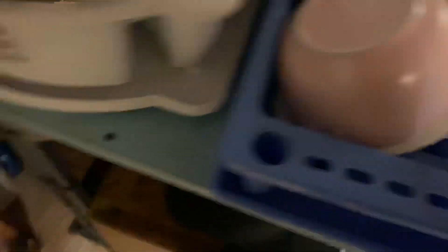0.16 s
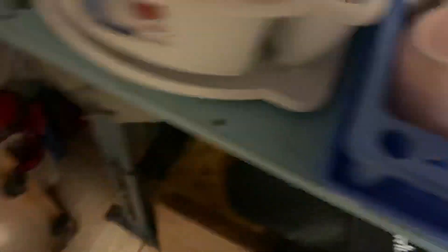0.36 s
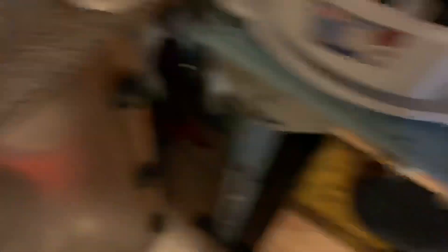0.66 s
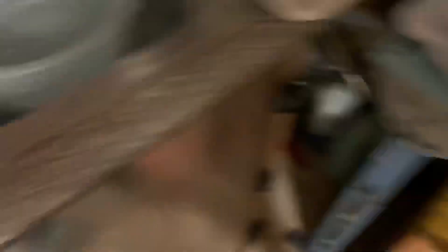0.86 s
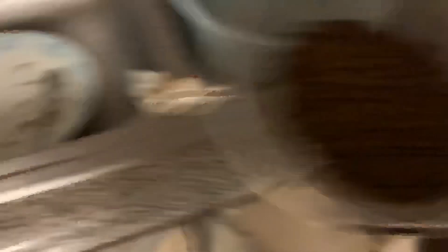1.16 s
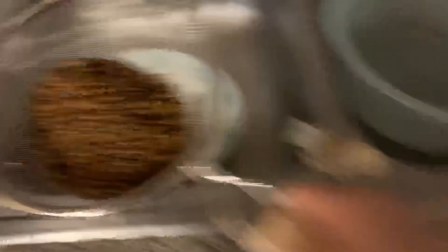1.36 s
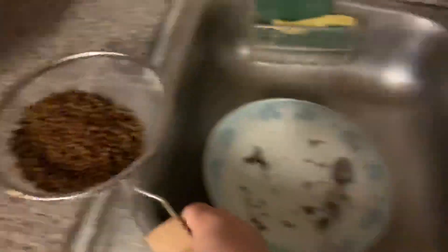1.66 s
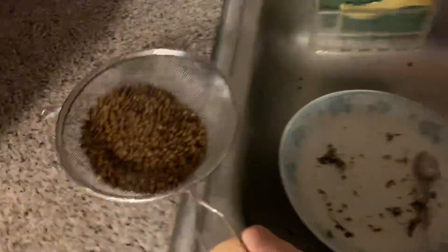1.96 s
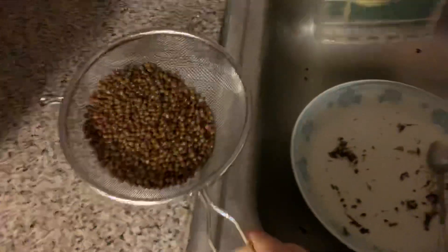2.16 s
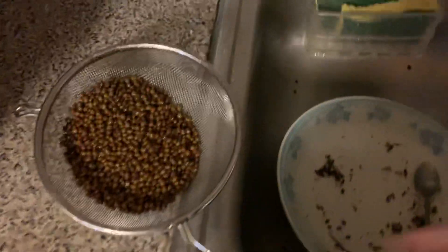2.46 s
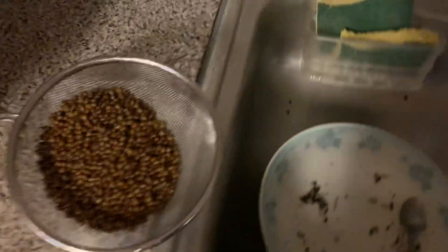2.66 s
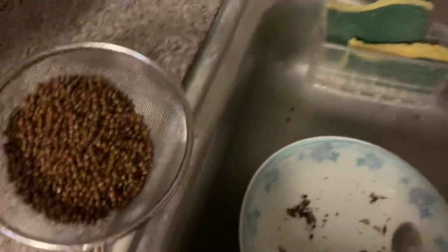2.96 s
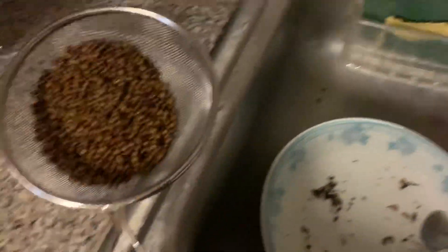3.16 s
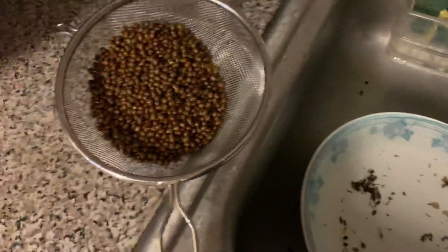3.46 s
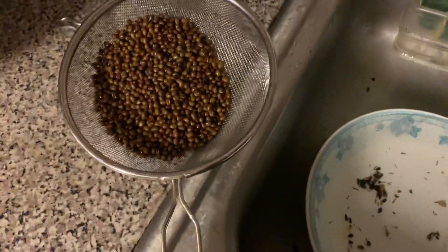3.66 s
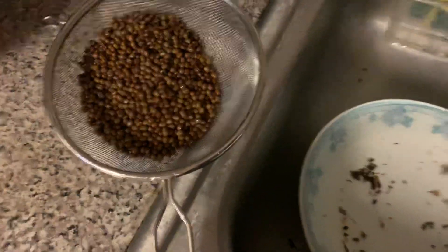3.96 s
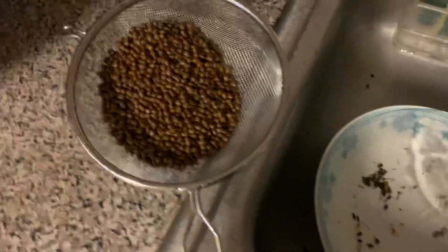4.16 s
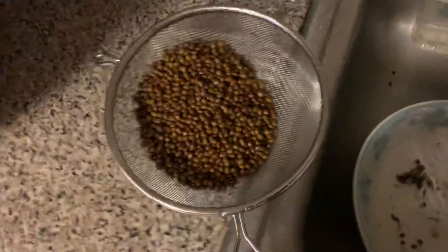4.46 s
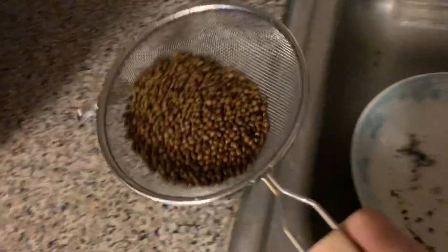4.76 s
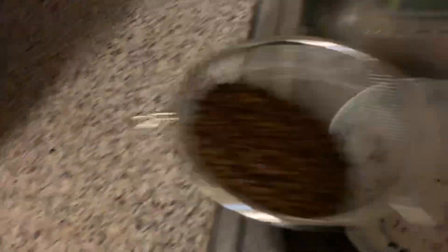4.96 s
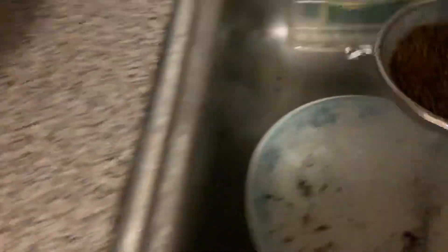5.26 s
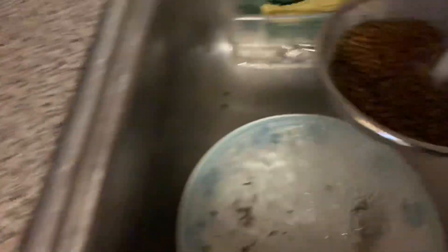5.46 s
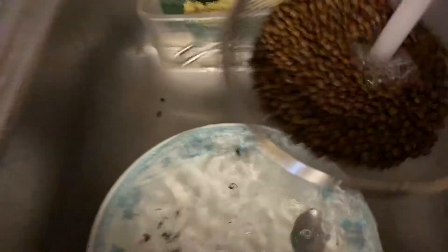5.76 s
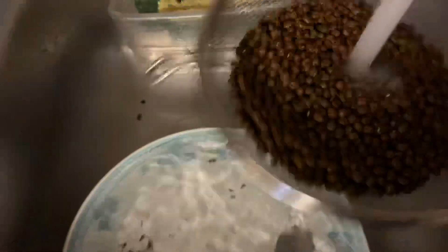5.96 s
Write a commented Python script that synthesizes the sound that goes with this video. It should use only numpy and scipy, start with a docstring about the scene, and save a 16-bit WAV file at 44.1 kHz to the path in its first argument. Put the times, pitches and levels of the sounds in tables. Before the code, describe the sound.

Close kitchen handling: metal clinks, dry beans rustling, hollow sink thuds, then a sudden steady tap stream that turns to bubbly splashing and gurgling.

```python
"""A small kitchen before a close pair of microphones: low rumble and the hum of an appliance throughout.
A wire strainer of beans is picked up straight ahead with a clink of ringing rim modes and carried to the
side; beans slide and tumble in its mesh (dense random grains), it is set down, and blows boom in the steel sink.
The tap spits a burst of grains, then runs: aerated hiss, resonances of the basin and drumming on its floor.
At last the stream splashes over the beans, as drops and ringing bubbles, and gurgles into a bowl below."""
import sys
import numpy as np
from scipy import signal
from scipy.fft import rfft, irfft, next_fast_len
from scipy.io import wavfile

SR = 44100
rng = np.random.default_rng(int(sys.argv[2]) if len(sys.argv) > 2 else 0)


def put_to_file(sound):
    """Save the sound as 16-bit audio at rate SR, in the file named by the first command-line argument."""
    columns = np.atleast_2d(sound).T  # one column per channel
    safe = np.clip(columns, -1, 1)
    whole_steps = np.round(safe * 32767)
    wavfile.write(sys.argv[1], SR, whole_steps.astype(np.int16))


N = 269451
TIME = np.arange(N) / SR

# rumble of the room: (frequency [Hz], level [dB])
RUMBLE_SPECTRUM = [(12, -35.5), (20, -3.5), (32, -3.5), (54, -1.5), (72, -15), (124, -14.5), (155, -25),
                   (256, -25), (357, -23.5), (387, -28), (433, -32), (753, -40.5), (1210, -41), (1930, -53),
                   (15000, -60.5)]
RUMBLE_DB = -50
# appliance hum: (frequency [Hz], level [dB])
HUM_TONES = [(48.4, -52.5), (355.3, -77), (1190, -83), (1308, -93.5), (1427, -85), (3445, -93),
             (3984, -92.5)]

# beans slide in the mesh at each tilt or jolt: (time [s], length [s], level [dB], scrape pitch [Hz])
SLIDES = [(0, 0.24, -64.5, 4740), (0.101, 0.026, -47, 4820), (1.165, 0.32, -71.5, 2630),
          (1.366, 0.039, -47.5, 2900), (1.421, 0.19, -45, 3950), (1.667, 0.031, -51, 3480),
          (1.801, 0.013, -52.5, 3500), (1.944, 0.13, -78, 3470)]
# bean against mesh: (frequency [Hz], level [dB])
BEAN_SPECTRUM = [(400, -8.5), (1000, -14.5), (1500, -3), (2600, -11.5), (3600, 4.5), (5200, 3.5),
                 (7500, 13), (10000, 11), (13000, 11), (15000, 0)]
SLIDE_RISE_S, SLIDE_T60_S, TICK_T60_S = 0.026, 0.22, 0.011
# soft handling noise while things are carried: (time [s], length [s], level [dB])
CARRIES = [(0, 0.033, -49.5), (0.539, 0.27, -63.5), (0.939, 0.021, -50.5), (1.2, 0.848, -57.5),
           (2.22, 0.11, -60.5)]
CARRY_RISE_S, CARRY_T60_S = 0.075, 0.37
# colour of the handling noise: (frequency [Hz], level [dB])
RUSTLE_SPECTRUM = [(60, -3), (130, -11), (300, -6), (700, -15), (1500, -22.5), (4000, -31.5),
                   (15000, -55.5)]
# dull knocks of handle and dishes:
# (time [s], level [dB], pitch [Hz], t60 [s], relative clack level [dB], clack top [Hz])
KNOCKS = [(.071, -55, 1200, .025, 2, 1500), (.116, -28, 600, 0.028, -10, 1500),
          (0.288, -44.5, 260, 0.1, -13, 500), (0.396, -24, 225.7, 0.045, -14, 450),
          (1.161, -32.5, 278, 0.062, -5, 500), (1.467, -37.5, 330, 0.036, 5, 1710),
          (1.689, -23.5, 330, 0.041, -18, 900), (1.732, -27, 302, 0.07, -15.5, 1000),
          (1.808, -31, 290, 0.085, 2, 2900), (1.909, -37, 376, 0.038, -1, 1600),
          (4.044, -27, 560, 0.03, 8, 1500)]
# sharp contacts of the wire rim: (time [s], level [dB], relative ring level [dB])
CLINKS = [(.115, -18.5, -4.5), (0.1194, -41, -7), (0.312, -46.5, -26), (0.325, -50.5, -8),
          (1.284, -38, -28), (1.3275, -35.5, -22), (1.689, -34, -19), (1.812, -28, -19),
          (1.9077, -44.5, -23), (2.042, -47.5, -23.5), (2.212, -33, -25), (2.278, -52, -25),
          (2.3536, -44.5, -27), (3.409, -47, -12)]
# modes of the wire rim: (frequency [Hz], level [dB], t60 [s])
RIM_MODES = [(4650, -14, 0.082), (5144, -2, 0.028), (6140, -9, .04), (6930, -18, 0.038), (7340, -28, .07),
             (7880, -17.5, 0.19), (10250, -10, .04), (12400, -13, 0.11), (12500, -16.5, .11),
             (13290, -13.5, .1), (13800, -20.5, .07), (14060, -26.5, 0.073)]
# the heap of beans breaks loose as the strainer swings over the sink
TUMBLE_S, TUMBLE_HOLD_S, TUMBLE_DB, TUMBLE_RISE_S, TUMBLE_T60_S = 1.381, .016, -46, .008, .11

# blows on the sink: (time [s], level [dB], pitch round which the struck spot responds [Hz])
SINK_BLOWS = [(1.808, -32, 90), (2.217, -36.5, 164), (3.243, -27.5, 171), (3.308, -20.5, 87),
              (3.347, -18, 243), (3.351, -21.5, 83.6), (3.383, -25, 98.7), (3.775, -24.5, 155),
              (3.796, -30, 182), (4.055, -29.5, 130.6)]
# modes of the steel sink: (frequency [Hz], level [dB], t60 [s])
SINK_MODES = [(67.6, -7, 0.81), (90.7, 2.5, 0.11), (119.2, -5, 0.36), (125.5, -12.5, 0.76),
              (177, -12, 0.52), (200, -3, 0.087), (227.4, -20, 0.22), (252.4, -24, 0.2), (296, -17.5, 0.36),
              (375.6, -22, 0.4), (461, -11.5, 0.55), (570, -21, 0.35), (810, -14, 0.3), (978, -5, 0.67)]
# after the heaviest blow the strainer rocks to rest between two spots of the sink
ROCK_S, ROCK_GAP_S, ROCK_DB, ROCK_LOSS_DB = 3.455, 0.034, -25, 2.5
# pitch round which each of the two spots responds: one column [Hz]
ROCK_SPOTS = [81, 158]
# loose things rattling on the shaking steel: (frequency [Hz], level [dB])
RATTLE_SPECTRUM = [(250, 2), (600, -6), (1100, -17), (2200, -33), (3500, -34), (7000, -45), (15000, -44)]
# the strainer clatters on the steel edge:
# (time [s], level [dB], relative clack level [dB], pitch round which the touched spot rings [Hz])
CLATTERS = [(1.81, -40, 5, 1520), (3.304, -44, -19, 743), (3.345, -24.5, 4.5, 974), (3.359, -31.5, -4, 895),
            (3.384, -43.5, -3, 746), (3.409, -43.5, 11, 1400), (3.494, -49.5, 3, 810),
            (4.044, -39, 7, 1500)]
# modes of that contact: (frequency [Hz], level [dB], t60 [s])
EDGE_MODES = [(292, 4.5, 0.3), (440, 2.5, 0.13), (577, -1, 0.12), (650, 0.5, 0.048), (830, -16, 0.097),
              (976, -2, 0.047), (1150, -16, 0.025), (1270, -6.5, 0.059), (1400, -3, 0.044),
              (1870, -5, 0.044), (2050, -2.5, 0.05), (2340, -12, 0.044)]
# dry clack of the strainer on the steel: (frequency [Hz], level [dB])
CLACK_SPECTRUM = [(200, 3), (600, 20), (1300, 14), (2200, 20), (3500, -5), (7000, -32), (15000, -38)]
# each clatter is a light graze, then a quick run of ever softer touches
TOUCH_GAP_S, TOUCH_LOSS_DB, GRAZE_DB = 0.0046, 2.5, -9.5
SPOT_WIDTH_OCT = 0.45
# a dish is nudged: (time [s], level [dB])
NUDGES = [(1.81, -40.5), (2.207, -51), (3.407, -57)]
# modes of the dish: (frequency [Hz], level [dB], t60 [s])
DISH_MODES = [(1200, -15, 0.056), (1300, -1, 0.11), (1383, 1, 0.11), (1644, -5, 0.13), (1940, -13, .08),
              (2360, -10, 0.065)]
# the strainer is set down on the counter: (time [s], level [dB], top of the touch [Hz])
SET_DOWNS = [(2.2063, -40, 2200), (2.2164, -40, 700), (2.327, -51.5, 600)]
# modes of the loaded strainer: (frequency [Hz], level [dB], t60 [s])
STRAINER_MODES = [(313, -11, 0.27), (367, -8, 0.28), (542, -2, 0.073), (593, 3, 0.091), (694, -12, .16),
                  (816, 4.5, 0.063), (1180, 6.5, 0.021), (1400, 1, 0.023), (1740, -8, 0.037)]

# the spout spits once before the water arrives
SPIT_S, SPIT_HOLD_S, SPIT_DB, SPIT_RISE_S, SPIT_T60_S = 3.758, 0.05, -33, 0.003, 0.18
# colour of the spit: (frequency [Hz], level [dB])
SPUTTER_SPECTRUM = [(300, -1.5), (450, -12), (680, 3), (950, -2.5), (1250, -9), (2000, -4), (3000, -3.5),
                    (4500, -18.5), (8000, -19.5), (15000, -22.5)]
# the tap opens with a surge of pressure that settles to a steady flow
OPEN_S, OPEN_RISE_S, SURGE_DB, SETTLE_S = 3.837, 0.0099, 2, 0.32
STREAM_DB = -31
# colour of the aerated jet: (frequency [Hz], level [dB])
HISS_SPECTRUM = [(200, -25), (450, -22), (800, -18), (1200, -11.5), (1600, -9.5), (1950, -7), (2250, -12),
                 (2600, -7.5), (3050, -11.5), (3600, -9.5), (4700, -8.5), (5250, -10), (5700, -8.5),
                 (8500, -0.5), (11500, 3), (15000, 5.5)]
# last pockets of air make the hiss flare: (time [s], level [dB])
SPURTS = [(3.844, 4), (3.929, 3.3)]
SPURT_S = 0.014
# resonances that colour the jet in the basin: (frequency [Hz], width [Hz], level [dB])
BASIN_RESONANCES = [(330.6, 28.6, 17), (471, 14, 14.5), (965, 64, 13), (1553, 33, 16.5), (1780, 35, 16.5),
                    (2005, 66, 17.5), (2597, 51, 15.5), (3690, 140, 10), (4035, 74, 17), (4616, 380, 10),
                    (6150, 150, 13.5), (6540, 190, 12.5)]
# once the beans cover the stream, it sounds the basin far less
COVER_S, COVER_LENGTH_S, COVER_LOSS_DB = 5.29, 0.044, 18
# the stream drumming on the sink floor: (frequency [Hz], level [dB])
DRUM_SPECTRUM = [(60, 8), (95, 0.5), (135, 3.5), (180, -16.5), (250, -12.5), (450, -19.5), (900, -21),
                 (4000, -70)]
# the drumming is harder in the surge and again as the splash grows
DRUM_DB, DRUM_SURGE_DB, DRUM_SPLASH_LIFT_DB = -46, 0.5, 3
# the mesh cuts into the stream and lifts its hiss; the hiss lifts again with the splash
MESH_S, MESH_ENTRY_S, MESH_LIFT_DB, SPLASH_LIFT_DB = 5.11, 0.21, 2.5, 5.5
# the stream sounds hollow, with peaks round the odd multiples of this pitch
HOLLOW_HZ = 501

# how hard the water lands on the beans as the strainer moves under it: (time [s], level [dB])
SPLASH_LEVELS = [(4.3, -65), (5.1, -47), (5.38, -38.5), (5.62, -34), (5.88, -32.5), (5.92, -28),
                 (5.96, -32), (6.02, -28), (6.05, -33.5), (6.11, -27.5)]
# drops on the beans: (frequency [Hz], level [dB])
SPATTER_SPECTRUM = [(200, 1), (350, -23), (550, -6), (800, 4.5), (1300, 10), (1700, 3), (2100, 13),
                    (3800, 15), (6500, 10), (9000, -3), (11000, -23.5), (15000, -35)]
# lumps of water land, first on the steel, then on the beans and in the bowl:
# (time [s], length [s], level [dB], centre [Hz])
SPLATS = [(4.167, 0.0097, -43, 600), (4.326, 0.018, -51, 550), (5.046, .008, -43, 680),
          (5.629, 0.007, -34, 830), (5.811, 0.011, -37, 840), (5.899, 0.018, -28.5, 4070),
          (6.02, 0.0051, -37, 1090)]
# run-off gurgles in the bowl from this time on, at a level relative to the splash
GURGLE_S, GURGLE_DB, GURGLES_PER_S = 5.35, -15.5, 90
# run-off patters into the bowl below, which sings: (frequency [Hz], width [Hz], level [dB])
BOWL_RESONANCES = [(476, 17, 10), (600, 27, -1), (1240, 62, 9), (1400, 41, 13.5), (1995, 190, 13.5)]
# larger bubbles: (time [s], level [dB], starting pitch [Hz], t60 [s])
GLUGS = [(5.358, -48.5, 600, 0.24), (5.392, -46.5, 485, 0.93), (5.512, -38, 589, 0.19),
         (5.635, -37.5, 493, 0.082), (5.762, -44.5, 686, 0.22), (5.812, -41, 1180, 0.064),
         (5.858, -45, 940, 0.1), (5.905, -39.5, 614, 0.091), (5.945, -42, 589, 0.17),
         (6.02, -36, 1240, 0.022)]

KITCHEN_T60_S = 0.22
# stereo width of sounds from the side: (frequency [Hz], side gain [dB])
SIDE_WIDTH = [(15, -12.5), (100, -16), (500, -12), (1500, 0.5), (2300, -0.5), (3000, -4), (7000, 2.5),
              (9000, -16), (12000, -6), (15000, -14)]
# depth of the dips in that width, where both ports hear alike: (frequency [Hz], share [0-1])
PORT_DIPS = [(100, 0.05), (6000, 0.22), (9000, 1), (11000, 1), (15000, 0.94)]
# the left side's extra level: (frequency [Hz], level [dB])
LEFT_BALANCE = [(10, -5), (100, 0.5), (500, -0.5), (1200, 2), (2500, 5), (4500, -0.8), (15000, -0.5)]
# stereo width of sounds straight ahead: (frequency [Hz], side gain [dB])
AHEAD_WIDTH = [(200, -14), (600, -9), (2000, -7), (4000, -5), (7000, 0), (10000, 0.5), (15000, -0.5)]
LEFT_LAG_S = .00022
# the strainer starts straight ahead at the rack and swings to the side from this time on
TURN_S, TURN_LENGTH_S = 0.84, 0.25
CUTOFF_HZ = 15700


def from_db(db):
    """Decibels to gain."""
    return 10 ** (np.asarray(db) / 20)


def rms_one(x):
    """Scale to unit rms."""
    return x / np.sqrt(np.mean(x ** 2) + 1e-20)


def in_time(rows):
    """Each column of a curve at every sample."""
    s, *columns = np.transpose(rows)
    return [np.interp(TIME, s, c) for c in columns]


def colour(x, spectrum):
    """Filter by a (Hz, dB) curve that falls away below its first point."""
    size = next_fast_len(x.shape[-1] + 4096)
    hz = np.maximum(np.fft.rfftfreq(size, 1 / SR), 1)
    points, db = np.transpose(spectrum)
    gain = from_db(np.interp(np.log(hz), np.log(points), db))
    gain = gain * np.minimum(hz / points[0], 1) ** 2
    return irfft(rfft(x, size) * gain, size)[..., :x.shape[-1]]


def low_pass(x, top_hz):
    """Second-order low-pass."""
    return signal.sosfilt(signal.butter(2, top_hz, fs=SR, output="sos"), x)


def drift(rate):
    """Slow chance with rms 1, drawn at every 40th sample; a higher rate wanders faster."""
    r = np.exp(-80 * np.pi * rate / SR)
    slow = signal.lfilter([1], [1, -2 * r, r * r], rng.standard_normal(N // 40 + 2002))[2000:]
    return np.interp(np.arange(N) / 40, np.arange(len(slow)), rms_one(slow))


def ring(clicks, hz, t60):
    """A unit click sets a decaying sine of starting height 1 ringing."""
    r, w = from_db(-60 / (t60 * SR)), 2 * np.pi * hz / SR
    return signal.lfilter([0, np.sin(w)], [1, -2 * r * np.cos(w), r * r], clicks + 1e-18)


def resonate(x, hz, width_hz):
    """A resonance with gain 1 on top."""
    r = np.exp(-np.pi * width_hz / SR)
    feed = np.array([1, 0, -1]) * (1 - r * r) / 2
    return signal.lfilter(feed, [1, -2 * r * np.cos(2 * np.pi * hz / SR), r * r], x)


def fade(t60):
    """Half a second of exponential decay."""
    return from_db(-60 * TIME[:SR // 2] / t60)


def swell(s, hold_s, rise_s, t60):
    """An envelope that rises at time s, holds and dies away."""
    rise = np.clip((TIME - s) / rise_s, 0, 1)
    return rise * from_db(-60 * np.clip((TIME - s - hold_s) / t60, 0, 2))


def add(track, s, sound):
    """Mix a sound into a track at time s."""
    start = int(s * SR)
    track[..., start:start + sound.shape[-1]] += sound[..., :N - start]


def grains(per_s, spread_db):
    """Random stereo clicks of uneven size; a changing rate leaves their mean power even."""
    sizes = from_db(spread_db * np.minimum(rng.exponential(1, N), 4))
    born = rng.random(N) < per_s / SR
    return rms_one(born * sizes * rng.standard_normal((2, N)) / np.sqrt(per_s))


def kitchen(x, wet_db):
    """A close source plus dense reflections from tiles and steel, different on each side."""
    tail = rng.standard_normal((2, SR // 2)) * fade(KITCHEN_T60_S) * (TIME[:SR // 2] > .003)
    tail /= np.sqrt(np.sum(tail ** 2) / 2)
    return x + from_db(wet_db) * signal.fftconvolve(x[None], tail, axes=1)[:, :N]


def basin_walls(x, wet_db=-11, t60=0.053):
    """Quick reflections between the steel walls put a fine ripple on the sound's colour."""
    echoes = rng.standard_normal(SR // 2) * fade(t60) * (TIME[:SR // 2] > .002)
    echoes /= np.sqrt(np.sum(echoes ** 2))
    return x + from_db(wet_db) * signal.fftconvolve(x, echoes[None], axes=1)[:, :N]


def from_side(x):
    """A close pair of microphones hears one side: narrow bass, regular dips in treble width, the left late."""
    size = next_fast_len(N + SR // 10)
    hz = np.fft.rfftfreq(size, 1 / SR)
    depth = np.clip(np.interp(hz, *np.transpose(PORT_DIPS)), 0, 1)
    dips = 1 - depth * np.abs(np.cos(2 * np.pi * hz * LEFT_LAG_S))
    mid = rfft((x[0] + x[1]) / 2, size)
    side = rfft(colour((x[0] - x[1]) / 2, SIDE_WIDTH), size) * dips
    # half of the balance lifts the left, half lowers the right
    lean = from_db(np.interp(hz, *np.transpose(LEFT_BALANCE)) / 2)
    left = (mid + side) * lean * np.exp(-2j * np.pi * hz * LEFT_LAG_S)
    right = (mid - side) / lean
    return irfft(np.array([left, right]), size)[:, :N]


def from_ahead(x):
    """A sound straight ahead reaches both microphones at once."""
    mid, side = (x[0] + x[1]) / 2, colour((x[0] - x[1]) / 2, AHEAD_WIDTH)
    return np.array([mid + side, mid - side])


def room_tone():
    """Low rumble and the wavering hum of an appliance."""
    rumble = from_db(RUMBLE_DB) * rms_one(colour(rng.standard_normal((2, N)), RUMBLE_SPECTRUM))
    hum = np.zeros(N)
    for hz, db in HUM_TONES:
        level = from_db(db + 3 * drift(3.2)) * np.sqrt(2)
        hum += level * np.sin(2 * np.pi * hz * TIME + 0.17 * drift(1.2))
    return rumble + hum


def sliding_beans(level_db=1.5, scrape_db=-4.5, uneven_db=0.55, inertia_s=0.031, tick_db=-8):
    """Dense small collisions with the mesh, single beans ticking on its wires, and a scrape of gliding pitch."""
    rattle = rms_one(colour(grains(6000, spread_db=1.0), BEAN_SPECTRUM))
    # each tick falls on one of twelve wires
    wires_hz = np.geomspace(3400, 13500, num=12)
    hits, dealt = grains(350, spread_db=1), rng.integers(0, len(wires_hz), N)
    ticks = rms_one(sum(ring(hits * (dealt == k), hz, TICK_T60_S) for k, hz in enumerate(wires_hz)))
    unsteady = rms_one(low_pass(rng.standard_normal((2, N)), 550))
    levels = np.array([from_db(db + level_db) * swell(s, length, SLIDE_RISE_S, SLIDE_T60_S)
                       for s, length, db, _ in SLIDES])
    # the scrape glides towards the pitch of the loudest slide
    lag = np.exp(-1 / (inertia_s * SR))
    pitch = signal.lfilter([1 - lag], [1, -lag], np.array(SLIDES)[levels.argmax(axis=0), -1])
    scrape = unsteady * np.sqrt(2) * np.sin(2 * np.pi * np.cumsum(pitch) / SR)
    level = levels.max(axis=0) * from_db(uneven_db * drift(35))
    return level * (rattle + from_db(tick_db) * ticks + from_db(scrape_db) * scrape)


def carrying():
    """Soft rubbing and rumbling while the strainer is on the move: coloured noise in slow swells."""
    level = sum(from_db(db) * swell(s, length, CARRY_RISE_S, CARRY_T60_S) for s, length, db in CARRIES)
    return level * rms_one(colour(rng.standard_normal((2, N)), RUSTLE_SPECTRUM))


def knocks(clack_length_ratio=1.2, clack_db=-7, low_ratio=.76, high_ratio=1.36, rise_s=0.0025):
    """A clack, low-passed to suit the contact, with three damped modes round the pitch of the thing struck."""
    out, t = np.zeros(N), TIME[:SR // 2]
    modes = [(low_ratio, -.45), (1, .7), (high_ratio, .4)]
    for s, db, hz, t60, hard_db, top_hz in KNOCKS:
        body = sum(g * np.sin(2 * np.pi * hz * ratio * t) for ratio, g in modes)
        body = body * fade(t60) * (1 - np.exp(-t / rise_s))
        clack = rms_one(low_pass(rng.standard_normal(len(t)), top_hz)) * fade(clack_length_ratio * t60)
        add(out, s, from_db(db) * (body + from_db(hard_db + clack_db) * clack))
    return out


def clinks(crack_t60=0.016, crack_db=-8.5, buzz=0.31):
    """Each touch of the rim gives a bright crack; the wire rings briefly, blurred by the mesh buzzing on it."""
    cracks, taps = np.zeros(N), np.zeros(N)
    for s, db, ring_db in CLINKS:
        add(cracks, s, from_db(db + crack_db) * rng.standard_normal(SR // 2) * fade(crack_t60))
        add(taps, s, from_db([db + ring_db]))
    cracks = signal.sosfilt(signal.butter(2, 380, "high", fs=SR, output="sos"), cracks)
    return cracks + sum(from_db(db) * ring(taps, hz, t60) * (1 + buzz * drift(220))
                        for hz, db, t60 in RIM_MODES)


def tumbling_beans(per_s=2300.0, low_hz=900, high_hz=3800, cycles=6.3):
    """The heap breaks loose with a short rattle of bean on bean, each hit a brief ring at one of 12 pitches."""
    pitches = np.geomspace(low_hz, high_hz, num=12)
    hits, dealt = grains(per_s, spread_db=3.0), rng.integers(0, len(pitches), N)
    rattle = rms_one(sum(ring(hits * (dealt == k), hz, cycles / hz) * hz for k, hz in enumerate(pitches)))
    return from_db(TUMBLE_DB) * swell(TUMBLE_S, TUMBLE_HOLD_S, TUMBLE_RISE_S, TUMBLE_T60_S) * rattle


def rocking(count=5):
    """Ever softer blows that alternate between two spots: rows (time [s], level [dB], pitch [Hz])."""
    return [(ROCK_S + k * ROCK_GAP_S, ROCK_DB - k * ROCK_LOSS_DB, ROCK_SPOTS[k % 2]) for k in range(count)]


def sink_booms(rattle=0.022, rattle_t60=0.4, relative_width=0.62, level_db=-1.0, judder_db=3.5):
    """Rattling pushes excite the thin steel, each spot favouring its own modes; the load makes them judder."""
    force = np.zeros(N)
    for s, db, hz in SINK_BLOWS + rocking():
        push = rattle * rng.standard_normal(SR // 2) * fade(rattle_t60)
        push[0] = 1
        width_hz = relative_width * hz
        push = resonate(resonate(push, hz, width_hz), hz, width_hz)
        add(force, s, from_db(db + level_db) * push)
    return sum(from_db(db) * ring(force, hz, t60) * from_db(judder_db * drift(28))
               for hz, db, t60 in SINK_MODES)


def shaken(boom, rattle_db=-18, growth=1.32):
    """Beans and dishes chatter more than in proportion to how hard the sink shakes."""
    motion = np.sqrt(np.maximum(signal.lfilter([.004], [1, -.996], boom ** 2), 0))
    chatter = rms_one(colour(grains(4400.0, spread_db=-0.5), RATTLE_SPECTRUM))
    return boom + from_db(rattle_db) * motion.max() * (motion / motion.max()) ** growth * chatter


def clatters(count=3, clack_db=-10, clack_t60=0.028, uneven_db=2.0, buzz=0.99):
    """Quick touches, each with a dry clack; the edge's modes near the touched spot's pitch ring most."""
    taps, clacks = np.zeros((len(EDGE_MODES), N)), np.zeros(N)
    mode_hz = np.array(EDGE_MODES)[:, :1]
    for s, db, hard_db, spot_hz in CLATTERS:
        favour = 1 / (1 + (np.log2(mode_hz / spot_hz) / SPOT_WIDTH_OCT) ** 2)
        for k in range(-1, count):  # -1 is the graze
            when = s + k * TOUCH_GAP_S * rng.uniform(.85, 1.15)
            gain = from_db(db + (GRAZE_DB if k < 0 else -k * TOUCH_LOSS_DB))
            uneven = from_db(uneven_db * rng.standard_normal(favour.shape))
            add(taps, when, gain * favour * uneven * rng.choice([-1, 1], favour.shape))
            clack = rng.standard_normal(SR // 2) * fade(clack_t60)
            add(clacks, when, gain * from_db(hard_db + clack_db) * clack)
    out = clacks.std() * rms_one(colour(clacks, CLACK_SPECTRUM))
    for tap, (hz, db, t60) in zip(taps, EDGE_MODES):
        out = out + from_db(db) * ring(tap, hz, t60) * (1 + buzz * drift(55))
    return out


def crockery():
    """A nudged dish rings briefly in its modes."""
    taps = np.zeros(N)
    for s, db in NUDGES:
        add(taps, s, from_db([db]))
    return sum(from_db(db) * ring(taps, hz, t60) for hz, db, t60 in DISH_MODES)


def setting_down(scatter=0.065, scatter_t60=0.11, buzz=0.66):
    """The strainer lands on the counter, beans jostle; its wire bowl hums on, duller after a softer touch."""
    taps = np.zeros(N)
    for s, db, top_hz in SET_DOWNS:
        touch = scatter * rng.standard_normal(SR // 2) * fade(scatter_t60)
        touch[0] = 1
        add(taps, s, from_db(db) * low_pass(touch, top_hz))
    return sum(from_db(db) * ring(taps, hz, t60) * (1 + buzz * drift(35)) for hz, db, t60 in STRAINER_MODES)


def spitting_tap():
    """Trapped air bursts out of the spout just ahead of the water."""
    burst = from_db(SPIT_DB) * swell(SPIT_S, SPIT_HOLD_S, SPIT_RISE_S, SPIT_T60_S)
    return burst * rms_one(colour(grains(6000., spread_db=2.0), SPUTTER_SPECTRUM))


def basin_air(wander=.016, waver_db=2.0):
    """Each resonance of the basin wanders in pitch and strength as the water spreads; rms 1."""
    out = 0
    for hz, width, db in BASIN_RESONANCES:
        cycles = np.cumsum(hz * (1 + wander * drift(3))) / SR
        narrow = signal.butter(1, width / 2, fs=SR, output="sos")
        churn = signal.sosfilt(narrow, rng.standard_normal((2, N)))
        out = out + from_db(db + waver_db * drift(5)) * churn * np.sin(2 * np.pi * cycles)
    return rms_one(out)


def stream(hiss_db=7.5, basin_db=-9, flutter_db=0.75, drum_flutter_db=3.0):
    """The aerated jet fizzes, sounds the basin's air and drums on its floor."""
    surge = np.exp(-np.maximum(TIME - OPEN_S, 0) / SETTLE_S)
    in_mesh = np.clip((TIME - MESH_S) / MESH_ENTRY_S, 0, 1)
    covered = np.clip((TIME - COVER_S) / COVER_LENGTH_S, 0, 1)
    splash_db, = in_time(SPLASH_LEVELS)
    caught = from_db(splash_db - splash_db.max())
    level_db = STREAM_DB + SURGE_DB * surge + MESH_LIFT_DB * in_mesh + SPLASH_LIFT_DB * caught ** 2
    spurt_db = sum(db * np.exp(-((TIME - s) / SPURT_S) ** 2) for s, db in SPURTS)
    drumming_db = DRUM_DB + DRUM_SURGE_DB * surge + DRUM_SPLASH_LIFT_DB * caught
    flow = (1 + np.tanh((TIME - OPEN_S) / OPEN_RISE_S)) / 2
    fizz = from_db(hiss_db + spurt_db) * rms_one(colour(grains(22000., spread_db=-3.0), HISS_SPECTRUM))
    basin = from_db(basin_db - COVER_LOSS_DB * covered) * basin_air()
    jet = from_db(level_db + flutter_db * drift(43)) * (fizz + basin)
    drum = rms_one(colour(rng.standard_normal((2, N)), DRUM_SPECTRUM))
    return flow * (jet + from_db(drumming_db + drum_flutter_db * drift(6.4)) * drum)


def hollow(x, echo=0.32, wander=0.025, dull_hz=5500):
    """One short, dull, inverted echo whose delay wanders as things move."""
    then = TIME - (1 + wander * drift(4.9)) / (2 * HOLLOW_HZ)
    late = np.array([np.interp(then, TIME, channel) for channel in x])
    return x - echo * colour(late, [(20, 0), (dull_hz, 0), (15000, -12)])


def splash(spatter_db=-1, bubble_db=-7, cycles=25.0, surge_db=2.7,
           drops_per_s=25000.0, bubbles_per_s=2500.0):
    """Drops spatter on the beans and trap small bubbles ringing at their own pitches; louder is denser."""
    level_db, = in_time(SPLASH_LEVELS)
    share = from_db(level_db - level_db.max()) ** .5
    spatter = rms_one(colour(grains(drops_per_s * share, spread_db=2.0), SPATTER_SPECTRUM))
    pitches = np.geomspace(470, 4600, num=36)
    births, dealt = grains(bubbles_per_s * share, spread_db=1.8), rng.integers(0, len(pitches), N)
    bubbles = rms_one(sum(ring(births * (dealt == k), hz, cycles / hz) * hz ** 2.2
                          for k, hz in enumerate(pitches)))
    level = (TIME > OPEN_S) * from_db(level_db + surge_db * drift(12))
    return level * (from_db(spatter_db) * spatter + from_db(bubble_db) * bubbles)


def splats(relative_width=1.0, rise_s=0.0014, t60=0.027):
    """Lumps of water break into short, dense showers of drops."""
    drops = grains(5400.0, spread_db=4.0)
    out = 0
    for s, length, db, hz in SPLATS:
        width_hz = relative_width * hz
        shower = rms_one(resonate(resonate(drops, hz, width_hz), hz, width_hz))
        out = out + from_db(db) * swell(s, length, rise_s, t60) * shower
    return out


def bubble(hz, t60, rise):
    """A decaying tone that rises a little in pitch."""
    t = TIME[:SR // 2]
    return fade(t60) * np.sin(2 * np.pi * hz * t * (1 + rise * np.minimum(t / t60, 1)))


def gurgle(low_hz=620, high_hz=2000, cycles=40.0, rise=0.06, spread_db=3.5):
    """Middle-sized bubbles at random, each a short rising tone; they grow with the splash."""
    out = np.zeros(N)
    splash_db, = in_time(SPLASH_LEVELS)
    draws = rng.random((200, 3))  # waiting time, pitch, size
    times = GURGLE_S - np.cumsum(np.log(draws[:, 0])) / GURGLES_PER_S
    for s, (_, pitch, size) in zip(times[times < TIME[-1]], draws):
        hz = low_hz * (high_hz / low_hz) ** pitch
        gain = from_db(splash_db[int(s * SR)] + GURGLE_DB + spread_db * 2 * size)
        add(out, s, gain * bubble(hz, cycles / hz, rise))
    return out


def bowl(level_db=-39, fill_s=0.041, follows=0.2):
    """Once run-off reaches the bowl, its drops keep a few resonances sounding, louder as the splash grows."""
    drops = grains(2500., spread_db=0.0)
    splash_db, = in_time(SPLASH_LEVELS)
    song = sum(from_db(db + 2 * drift(3.2)) * resonate(drops, hz, width) for hz, width, db in BOWL_RESONANCES)
    level = from_db(level_db + follows * (splash_db - splash_db.max()))
    return level * np.clip((TIME - GURGLE_S) / fill_s, 0, 1) * rms_one(song)


def glugs(rise=0.033):
    """Run-off falls into the bowl below; each larger bubble rises a little in pitch."""
    out = np.zeros(N)
    for s, db, hz, t60 in GLUGS:
        add(out, s, from_db(db) * bubble(hz, t60, rise))
    return out


def scene():
    """The strainer swings from ahead to the side, where the tap runs; splash and bubbles are ahead."""
    booms = kitchen(sink_booms(), wet_db=-13)
    bumps = kitchen(knocks() + clatters() + setting_down() + crockery(), wet_db=-9)
    handling = kitchen(clinks(), wet_db=-6.0) + bumps + shaken(booms) + carrying()
    turned = np.clip((TIME - TURN_S) / TURN_LENGTH_S, 0, 1)
    beans_and_tap = basin_walls(sliding_beans() + tumbling_beans() + spitting_tap() + hollow(stream()))
    landing = basin_walls(splash() + splats()) + kitchen(glugs() + gurgle(), wet_db=2.0) + bowl()
    at_side = turned * handling + beans_and_tap + room_tone()
    ahead = (1 - turned) * handling + landing
    return from_side(at_side) + from_ahead(ahead)


def record(dry, gain_db=0.5):
    """The microphones' signal with its top cut by a steep low-pass, at a slight gain."""
    size = next_fast_len(N + SR // 10)
    hz = np.fft.rfftfreq(size, 1 / SR)
    top_cut = np.clip((CUTOFF_HZ + 100 - hz) / 200, 0, 1)
    return from_db(gain_db) * irfft(rfft(dry, size) * top_cut, size)[:, :N]


dry = scene()
out = record(dry)
put_to_file(out)
```